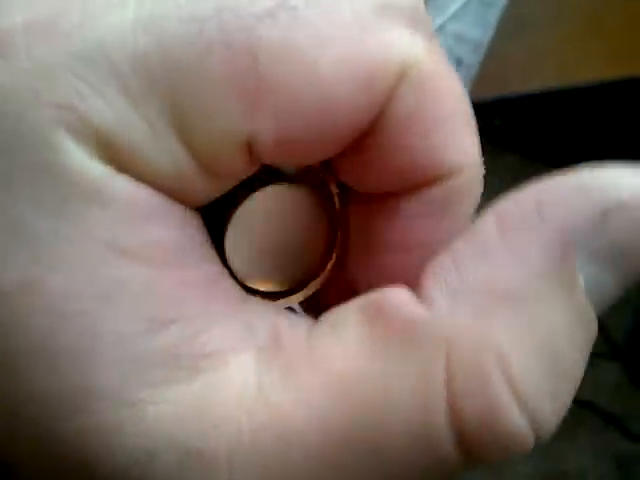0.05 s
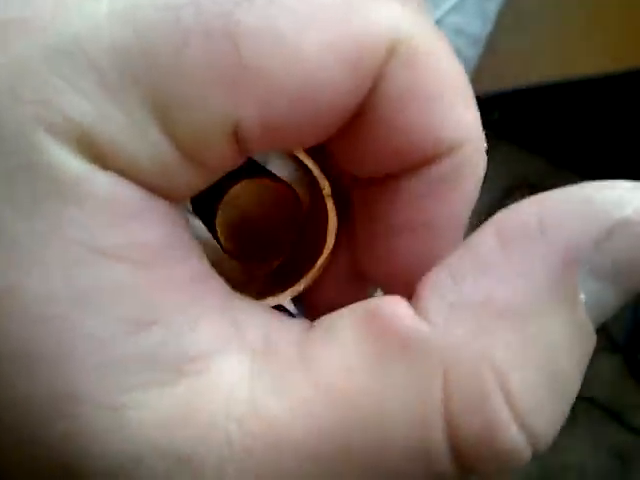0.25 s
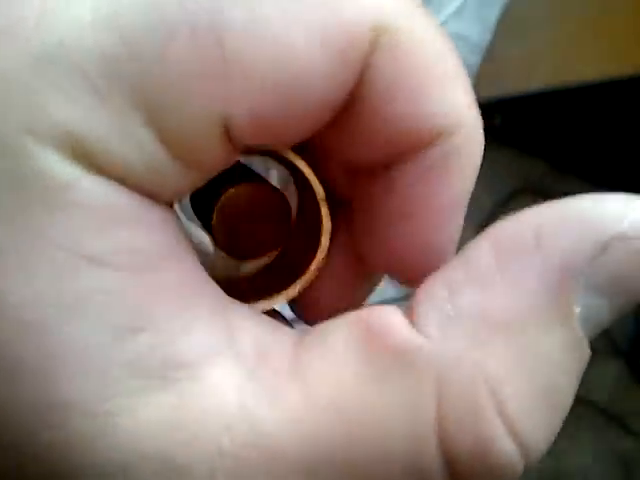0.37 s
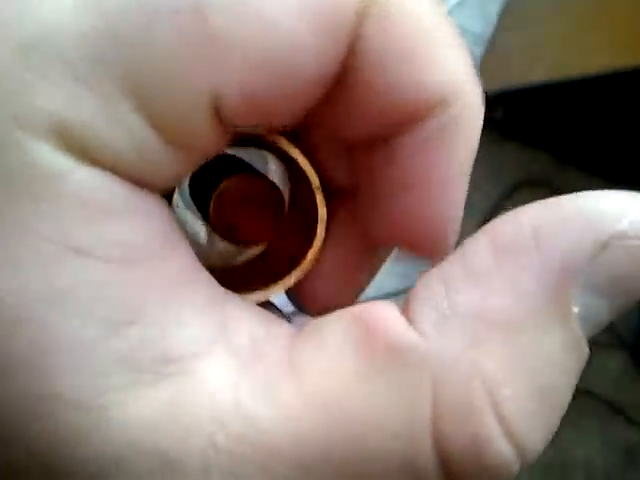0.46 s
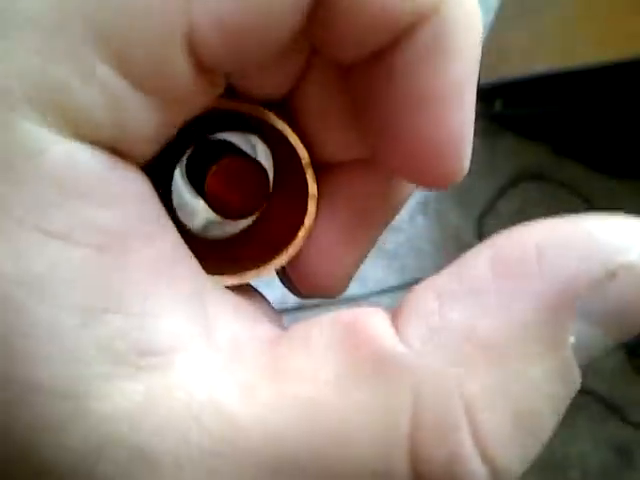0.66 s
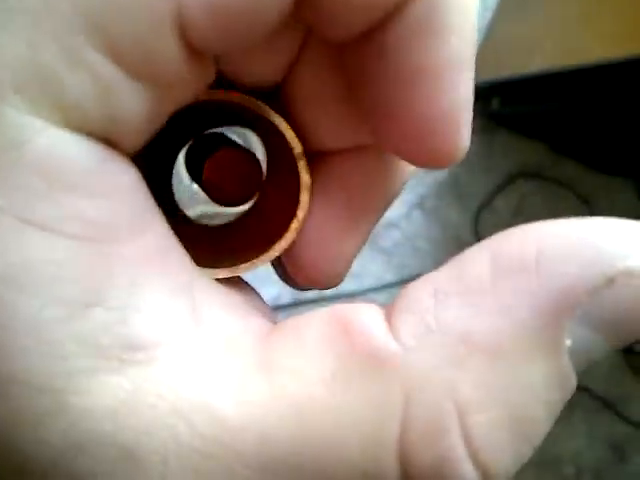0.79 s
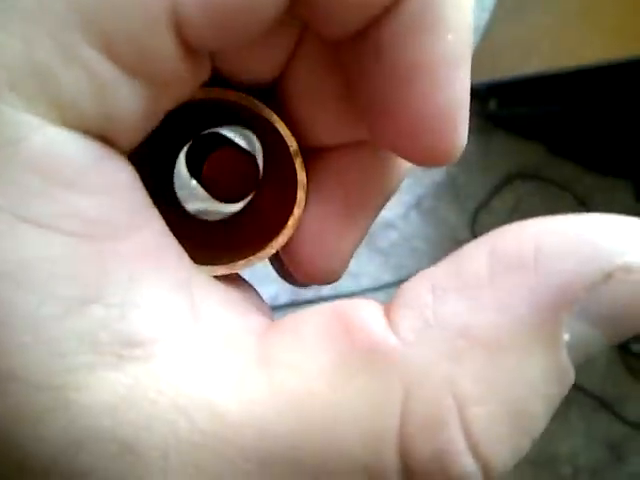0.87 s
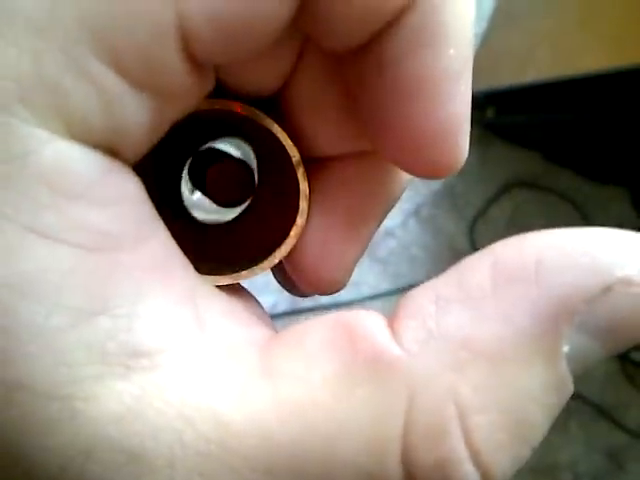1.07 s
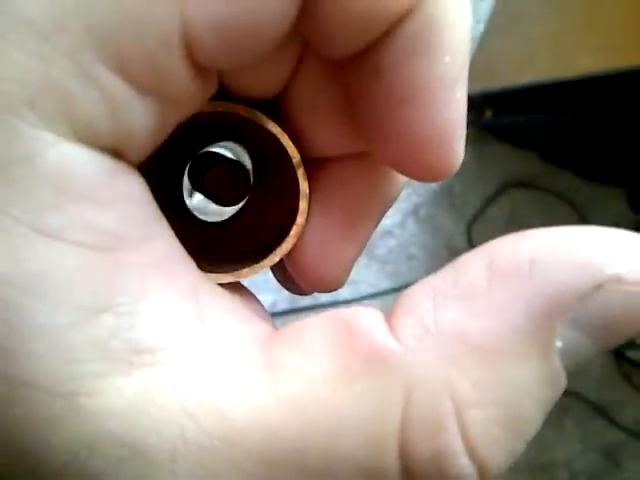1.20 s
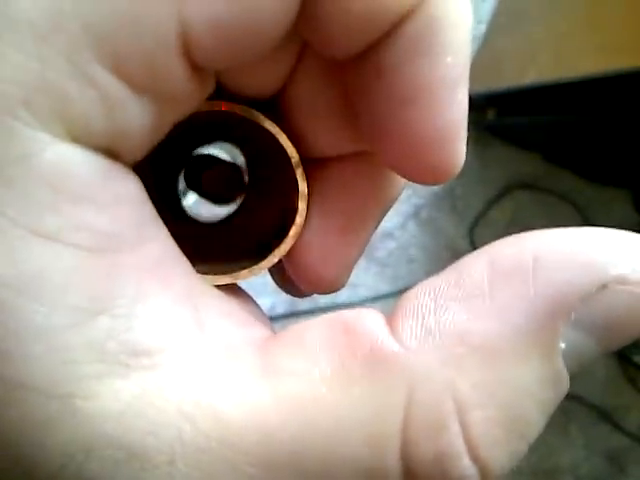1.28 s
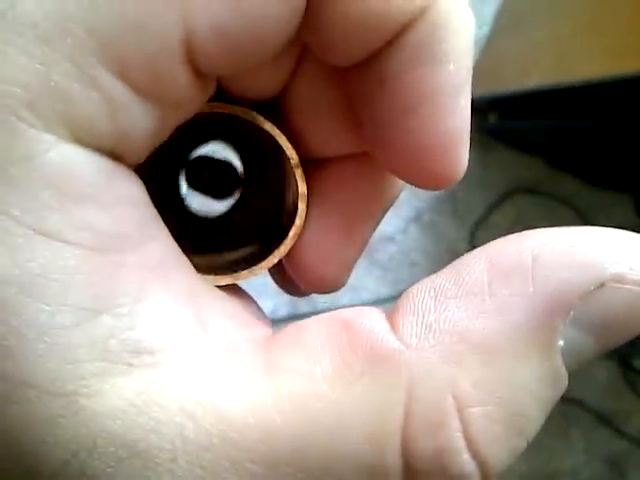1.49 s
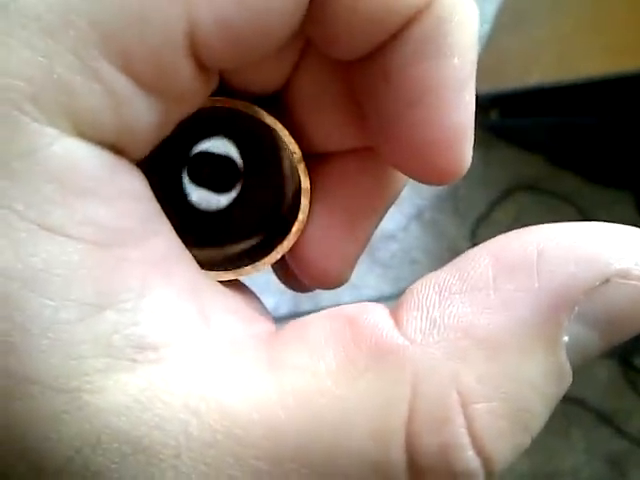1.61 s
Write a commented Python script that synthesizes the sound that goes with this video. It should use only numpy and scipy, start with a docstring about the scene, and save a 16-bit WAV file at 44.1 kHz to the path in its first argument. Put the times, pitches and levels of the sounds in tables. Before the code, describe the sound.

At about 0.25 seconds a magnet clacks sharply against a copper pipe and rebounds at once, with a short metallic ring that is quickly damped. From 0.4 seconds it slides down inside, with faint brushes against the wall and a thin, high whine. A soft, hollow scrape comes near 1.6 seconds. The sound is close, in a small room with steady low electric hum and hiss.

```python
"""Magnet sinking through a copper pipe

A strong magnet clacks against the mouth of a pipe held in a fist, rebounds, then sinks slowly.
It brushes the wall, so the pipe rings faintly, sings high and, far down, scrapes hollowly.
The room is small, with low electric hum and hiss. Gain ducks after the clack and creeps back."""
import sys
import numpy as np
from scipy import signal
from scipy.fft import rfft, irfft
from scipy.io import wavfile
from scipy.ndimage import uniform_filter1d

SR = 44100
rng = np.random.default_rng(int(sys.argv[2]) if len(sys.argv) > 2 else 0)


def to_wav(sig):
    """Store sig (one row per channel, or 1-D mono) as 16-bit WAV at the path in sys.argv[1].

    Samples outside -1..1 are clipped; the rate is SR.
    """
    pcm = np.clip(np.atleast_2d(sig), -1, 1) * 32767
    pcm = np.round(pcm).astype(np.int16)
    wavfile.write(sys.argv[1], SR, pcm.T)  # frames by channels


N = 72765
T = np.arange(N) / SR


def from_db(db):
    """Decibels to gain."""
    return 10 ** (np.asarray(db) / 20)


def envelope(rows):
    """Gain over time from (s, dB) points, silent before the first."""
    return from_db(np.interp(T, *np.transpose(rows), left=-120))


def clicks(times_s, db):
    """Single-sample impulses."""
    train = np.zeros(N)
    train[(times_s * SR).astype(int)] = from_db(db)
    return train


def ring(drive, hz, t60_s):
    """One mode: a unit click starts a decaying sine of height 1."""
    radius, angle = from_db(-60 / (t60_s * SR)), 2 * np.pi * hz / SR
    return signal.lfilter([0, np.sin(angle)], [1, -2 * radius * np.cos(angle), radius ** 2], drive + 1e-18)


# Hits on the mouth. Each row: start in seconds, ring in dB, tilt in dB per octave, clack in dB,
# singing resonance in dB.
HITS = [(0.2399, -34.5, -6, -20, -67), (.2450, -22.5, 0.5, -16, -68.5), (.2459, -46.5, -3.5, -4, -64.5),
        (.2757, -24, 2, -16.5, -26.5), (.2785, -43.5, 13.5, -12, -52), (.2822, -29, 1.5, -10, -52)]
# Hand-damped pipe. Each row: frequency in Hz, T60 in seconds, level in dB when struck, when rubbed,
# when rubbed far down.
PIPE_MODES = [(541, 0.59, -22, -26.5, -1.5), (909, 0.18, -10.5, -5, -4.5), (1696, 0.27, -5.5, -2.5, -18),
              (1799, 0.16, -14.5, -7.5, -5), (1927, 0.11, -8, -10, -20.5), (2111, 0.39, -16, -17, -19.5),
              (2711.5, 0.21, 2, 1, -2.5), (3075, 0.14, -14.5, -5, -1), (3140, 0.17, -19.5, -7.5, -27.5),
              (3258, .15, -18.5, -9.5, -30), (3438, 0.12, -23, -8, -6.5), (3692, 0.14, -18.5, -9.5, -19),
              (3887, .13, -8.5, -12, -2), (4563, 0.12, -7.5, -13, -11), (5148, 0.22, -3, -17.5, -12.5),
              (5890, 0.21, -14.5, -13, -20.5), (6530, 0.12, -20, -16, -24), (7280, 0.075, -18, -21.5, -12)]
TILT_PIVOT_HZ, SING_HZ = 3000, 6550
SETTLE_S, CHOKE_DB_PER_S = .286, 76   # rate at the pivot frequency
TWIN_SPLIT, TWIN_DB = 0.0072, -17.5   # the pipe is not quite round: each mode has a weaker twin


def pipe_ring():
    """Hits ring the pipe; the magnet then leans on the wall and chokes it, the treble most."""
    start_s, ring_db, tilt_db, _, sing_db = np.transpose(HITS)
    pipe = ring(clicks(start_s, sing_db), SING_HZ, t60_s=0.1)
    leaning_s = np.maximum(T - SETTLE_S, 0)
    for hz, t60_s, db, *_ in PIPE_MODES:
        drive = clicks(start_s, ring_db + db + tilt_db * np.log2(hz / TILT_PIVOT_HZ))
        twin = from_db(TWIN_DB) * ring(drive, hz * (1 + TWIN_SPLIT), t60_s)
        choke = from_db(-CHOKE_DB_PER_S * (hz / TILT_PIVOT_HZ) ** 2 * leaning_s)
        pipe += choke * (ring(drive, hz, t60_s) + twin)
    return pipe


# Magnet and rim. Each row: frequency in Hz, T60 in seconds, level in dB when struck, when rubbed.
RIM_MODES = [(856, .025, -27.5, -12), (1060, 0.0096, -23, -11.5), (1590, 0.013, -24, -14.5),
             (1926, 0.041, -14.5, -12), (2149, 0.024, -11, -1), (2831, 0.029, -14, -3.5),
             (3940, 0.0047, -12.5, -9.5), (5500, 0.012, -14.5, -13.5), (6660, 0.017, -24.5, -12)]


def rim_clack():
    """The same hits excite short, dead resonances of magnet and rim."""
    start_s, _, tilt_db, clack_db, _ = np.transpose(HITS)
    rim = np.zeros(N)
    for k, (hz, t60_s, db, _) in enumerate(RIM_MODES):
        drive = clicks(start_s, clack_db + db + tilt_db * np.log2(hz / TILT_PIVOT_HZ))
        rim += (-1) ** k * ring(drive, hz, t60_s)
    return rim


def unit_rms(x):
    """Scale to rms 1."""
    return x / np.sqrt(np.mean(x ** 2) + 1e-20)


def friction(catches_per_s=2700, spread_db=4.5):
    """Dense tiny catches of uneven size; rms 1."""
    sizes = from_db(spread_db * np.minimum(rng.exponential(1, N), 4))
    signs = rng.choice([-1, 1], N)
    caught = rng.random(N) < catches_per_s / SR
    return unit_rms(sizes * signs * caught)


def friction_band(hz, width_hz):
    """Friction through one resonant band; rms 1."""
    band = signal.butter(2, [hz - width_hz / 2, hz + width_hz / 2], "band", fs=SR, output="sos")
    return unit_rms(signal.sosfilt(band, friction()))


def rub_modes(modes, force):
    """Friction drives (Hz, T60 s, dB) modes; force 1 gives rms near 1."""
    drive = friction() * force
    rings = np.zeros(N)
    for k, (hz, t60_s, db) in enumerate(modes):
        energy_norm = np.sqrt(4 * np.log(1000) / (t60_s * SR))
        rings += (-1) ** k * from_db(db) * energy_norm * ring(drive, hz, t60_s)
    return rings / np.sqrt(sum(from_db(db) ** 2 for _, _, db in modes))


# Brief brushes. Each row: centre in seconds, Gaussian sigma in seconds, pipe in dB, rim in dB.
WALL_BRUSHES = [(0.4852, .0015, -54, -37.5), (0.4935, 0.0039, -52, -37), (0.525, 0.039, -62, -54.5),
                (0.579, 0.0084, -40.5, -38.5), (0.72, 0.025, -51, -46), (0.885, 0.009, -47.5, -56),
                (1.148, 0.0065, -43.5, -60.5), (1.231, 0.0055, -45.5, -62), (1.29, 0.0037, -44.5, -60.5),
                (1.365, 0.0028, -46.5, -52)]
# Steady rubbing. Each row: time in seconds, level in dB.
RUB_LEVELS = [(.3, -44), (.42, -50), (.65, -61.5), (.77, -53.5), (.84, -57.5), (.93, -50.5), (1.0, -52),
              (1.1, -44.5), (1.2, -59), (1.33, -56), (1.41, -61), (1.53, -67.5), (1.65, -50)]
RUB_T60_SCALE = 0.61   # the touching magnet shortens the ring


def wall_slide():
    """The magnet rubs and brushes along the wall; returns pipe, rim."""
    pipe_force, rim_force = envelope(RUB_LEVELS), np.zeros(N)
    for centre_s, sigma_s, pipe_db, rim_db in WALL_BRUSHES:
        swell = np.exp(-.5 * ((T - centre_s) / sigma_s) ** 2)
        pipe_force += from_db(pipe_db) * swell
        rim_force += from_db(rim_db) * swell
    pipe_modes = [(hz, t60_s * RUB_T60_SCALE, db) for hz, t60_s, _, db, _ in PIPE_MODES]
    rim_modes = [(hz, t60_s, db) for hz, t60_s, _, db in RIM_MODES]
    return rub_modes(pipe_modes, pipe_force), rub_modes(rim_modes, rim_force)


# Upper singing and lower, fainter whine. Each row: time in seconds, level in dB.
SING_LEVELS = [(.39, -58), (.45, -54.5), (.6, -51.5), (.68, -55.5), (.78, -52.5), (.87, -64), (1.0, -76),
               (1.08, -52.5), (1.24, -47), (1.32, -56.5), (1.366, -45.5), (1.41, -61), (1.54, -63),
               (1.65, -60)]
WHINE_LEVELS = [(.33, -60.5), (.45, -62), (.68, -62), (.72, -52), (.77, -58), (.95, -73), (1.1, -57.5),
                (1.2, -74), (1.33, -76), (1.38, -54), (1.5, -61), (1.55, -66)]


def edge_sing():
    """The sliding edge excites two narrow high resonances; the upper has a hissy skirt."""
    sing = friction_band(SING_HZ, width_hz=112)
    skirt = from_db(-9.5) * friction_band(hz=6633, width_hz=290)
    whine = friction_band(hz=5184, width_hz=75)
    return envelope(SING_LEVELS) * (sing + skirt) + envelope(WHINE_LEVELS) * whine


# Scraping deep in the pipe. Each row: time in seconds, level in dB.
SCRAPE_LEVELS = [(.85, -73), (1.12, -67), (1.3, -66), (1.52, -69), (1.565, -56), (1.605, -48.5),
                 (1.65, -55.5)]


def deep_scrape(ring_db=5):
    """Far down the pipe, friction sounds hollow and favours other modes."""
    force = envelope(SCRAPE_LEVELS)
    modes = [(hz, t60_s * RUB_T60_SCALE, db) for hz, t60_s, _, _, db in PIPE_MODES]
    rings = from_db(ring_db) * rub_modes(modes, force)
    hollow = force * friction_band(hz=1002.5, width_hz=795)
    return rings + hollow


def reflections(t60_s):
    """Dense echoes as decaying noise of about unit energy."""
    decay = from_db(-60 * T / t60_s)
    return rng.standard_normal(N) * decay * np.sqrt(2 * np.log(1000) / (t60_s * SR))


def room(x, gap_s=.004, tail_cutoff_hz=4640):
    """Small room: near reflections and a short, duller tail."""
    dull = signal.butter(2, tail_cutoff_hz, fs=SR, output="sos")
    early = from_db(-3) * reflections(t60_s=0.061)
    tail = from_db(-4) * signal.sosfilt(dull, reflections(t60_s=0.27))
    wet = signal.fftconvolve(x, early + tail)[:N]
    return np.interp(T - gap_s, T, wet, left=0)


# Each row: harmonic number, rms level in dB.
HUM_HARMONICS = [(1, -46.5), (2, -48.5), (3, -61.5), (4, -67), (5, -65.5), (6, -72), (7, -67.5), (8, -71.5),
                 (9, -72)]


def electric_hum(hz=58.65, peak_s=.4995):
    """Harmonics peak together, so the hum pulses once a cycle."""
    phase = 2 * np.pi * hz * (T - peak_s)
    return sum(np.sqrt(2) * from_db(db) * np.cos(k * phase) for k, db in HUM_HARMONICS)


# Each row: frequency in Hz, relative spectral density in dB.
HISS_SPECTRUM = [(20, 2.5), (60, 0), (150, -7), (300, -10.5), (600, -13.5), (1200, -16.5), (2200, -21),
                 (4000, -21.5), (6500, -20.5), (7300, -28)]
CUTOFF_HZ = 7400


def hiss(rms_db=-50):
    """Steady noise, strongest in the bass."""
    hz, db = np.transpose(HISS_SPECTRUM)
    bins_hz = np.fft.rfftfreq(N, 1 / SR)
    colour = from_db(np.interp(np.log(bins_hz + 1), np.log(hz), db)) * (bins_hz < CUTOFF_HZ)
    noise = irfft(rfft(rng.standard_normal(N)) * colour, N)
    return from_db(rms_db) * unit_rms(noise)


RADIATE_HZ = 560   # the narrow pipe radiates little below this
PIPE_SEND_DB = -13   # the pipe rings right at the microphone, so it is drier than the rim


def scene():
    """Magnet and pipe in the room, over hum and hiss; mono."""
    rub, rasp = wall_slide()
    radiation = signal.butter(3, RADIATE_HZ, "high", fs=SR, output="sos")
    pipe = signal.sosfilt(radiation, pipe_ring() + rub + edge_sing() + deep_scrape())
    rim = signal.sosfilt(radiation, rim_clack() + rasp)
    echoes = room(from_db(PIPE_SEND_DB) * pipe + rim)
    return (pipe + rim + echoes + electric_hum() + hiss())[None]


DUCK_ABOVE_DB, DUCK_DB_PER_DB, ATTACK_S, RECOVER_DB_PER_S = -33, 0.29, 0.01, 6.5


def record(dry):
    """Gain control ducks on loud sound and recovers slowly; the top is cut steeply."""
    level_db = 10 * np.log10(uniform_filter1d(dry[0] ** 2, size=220) + 1e-12)
    target_db = DUCK_DB_PER_DB * np.maximum(level_db - DUCK_ABOVE_DB, 0)
    recovery_db = RECOVER_DB_PER_S * T
    held_db = np.maximum.accumulate(target_db + recovery_db) - recovery_db
    pole = np.exp(-1 / (ATTACK_S * SR))
    duck_db = signal.lfilter([1 - pole], [1, -pole], held_db)
    lowpass = signal.ellip(12, .3, 80, CUTOFF_HZ, fs=SR, output="sos")
    return signal.sosfilt(lowpass, dry * from_db(-duck_db))


dry = scene()
out = record(dry)
to_wav(out)
```